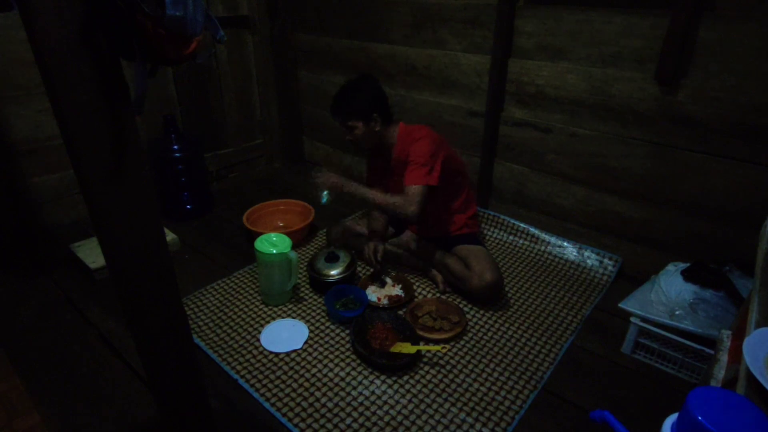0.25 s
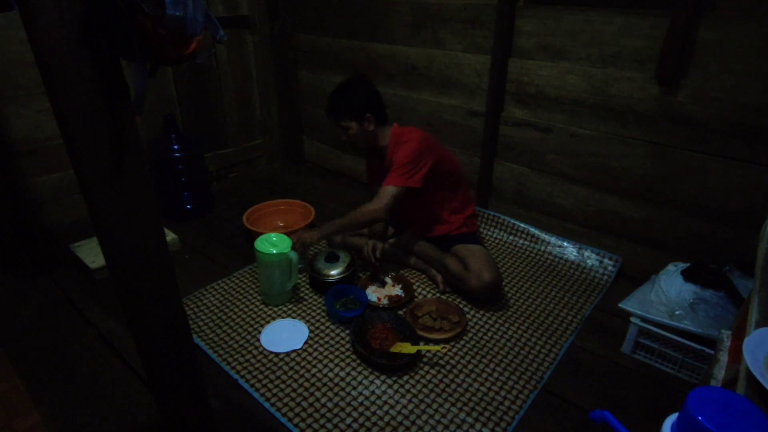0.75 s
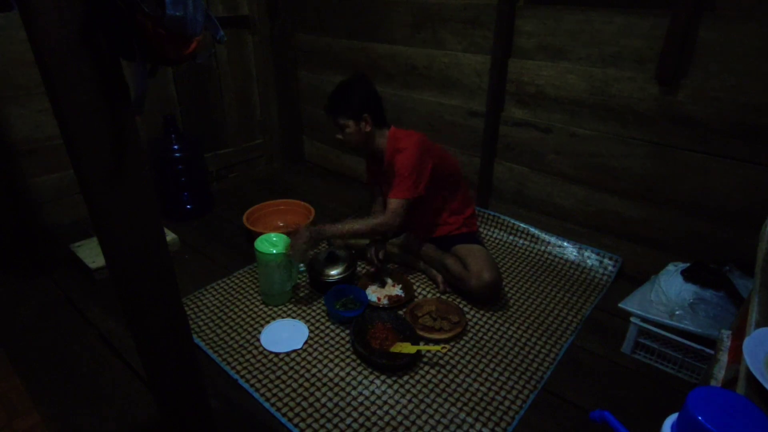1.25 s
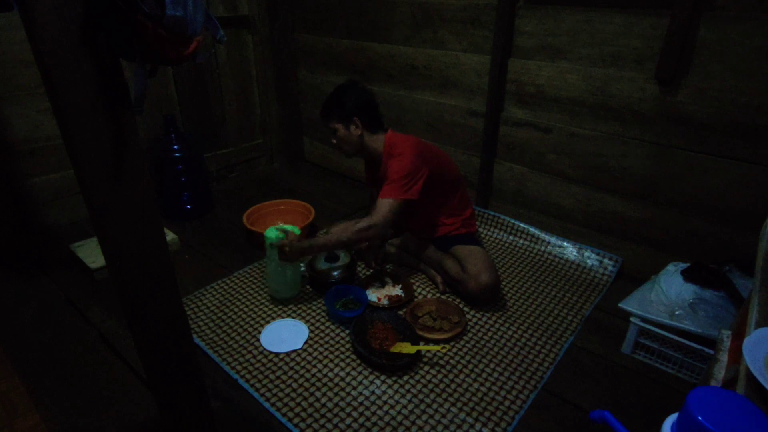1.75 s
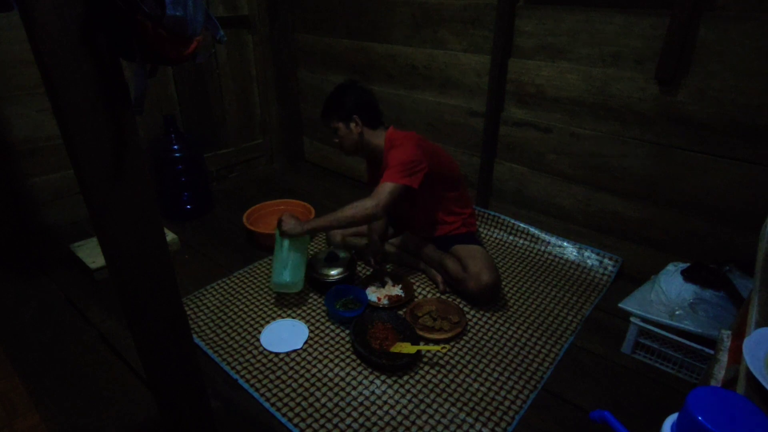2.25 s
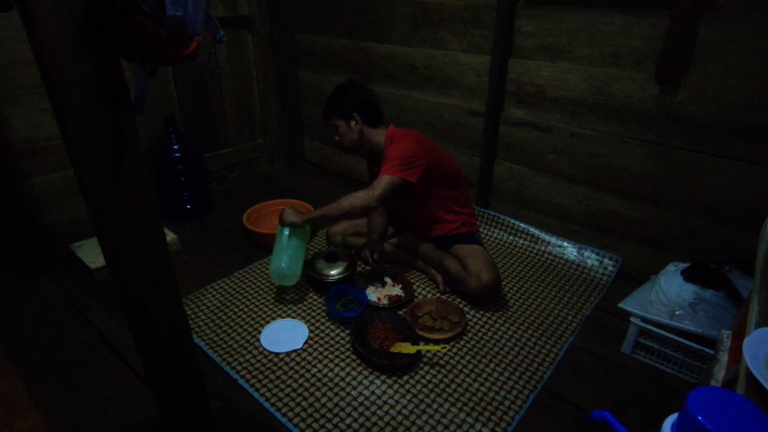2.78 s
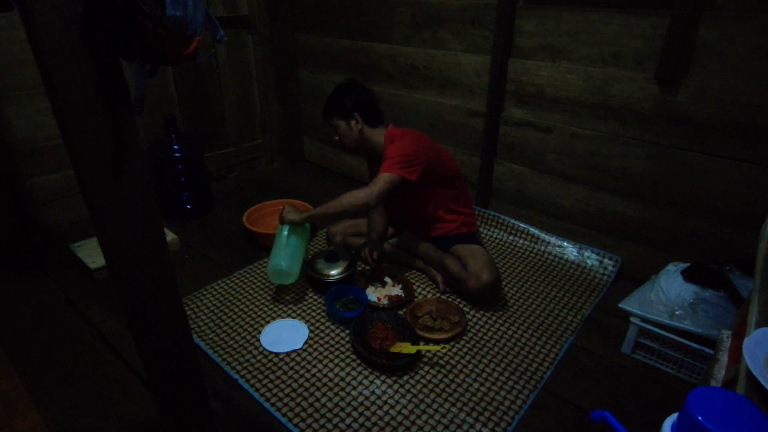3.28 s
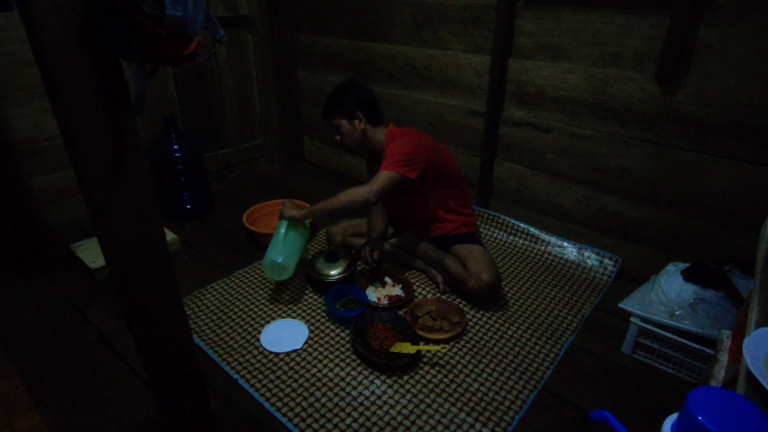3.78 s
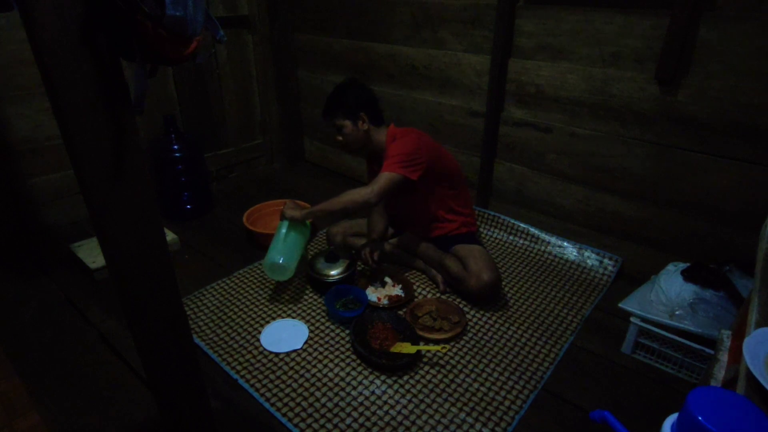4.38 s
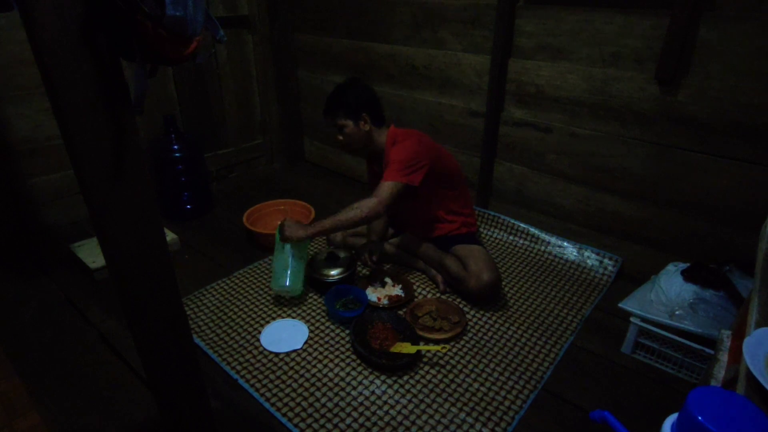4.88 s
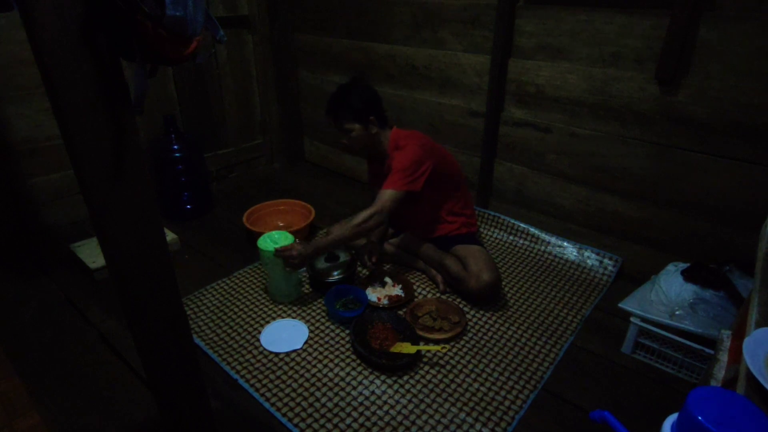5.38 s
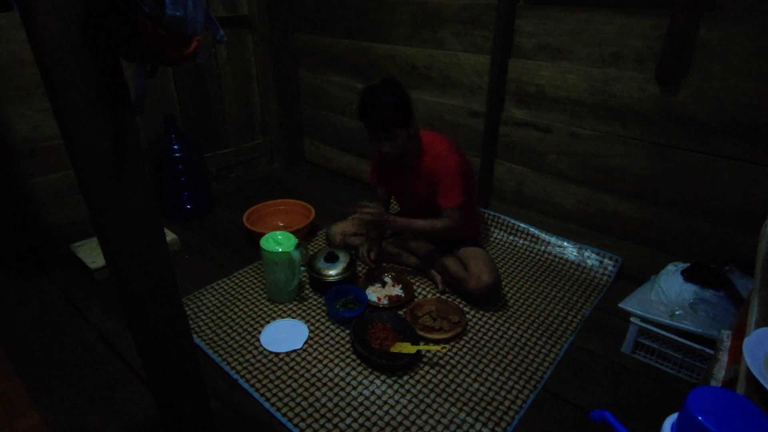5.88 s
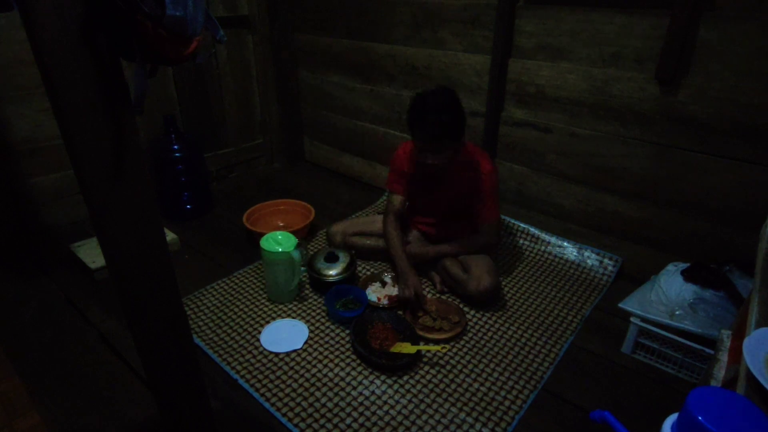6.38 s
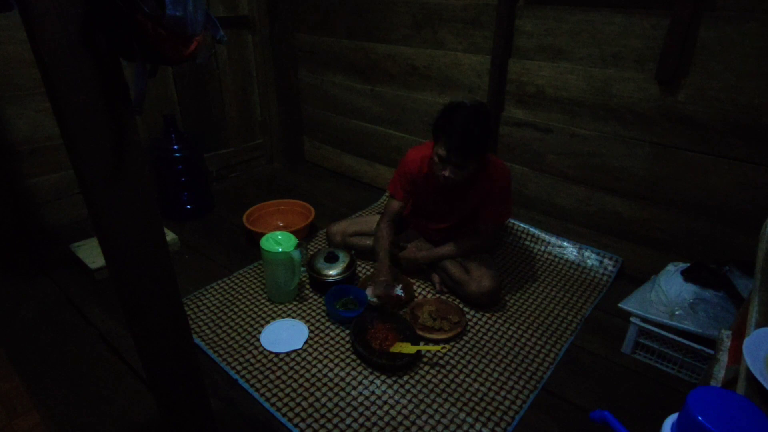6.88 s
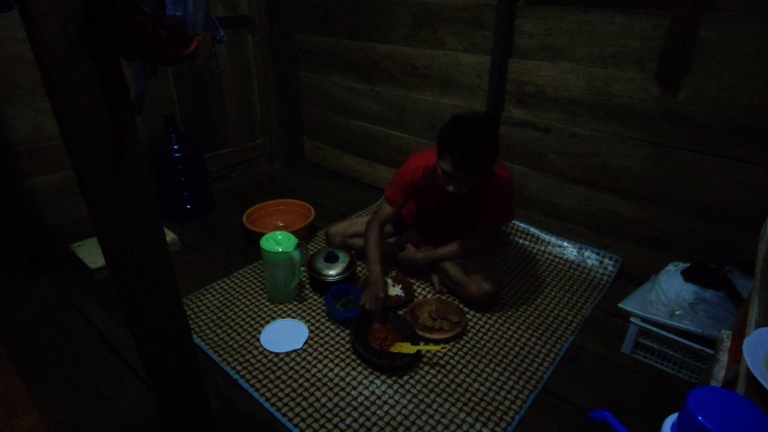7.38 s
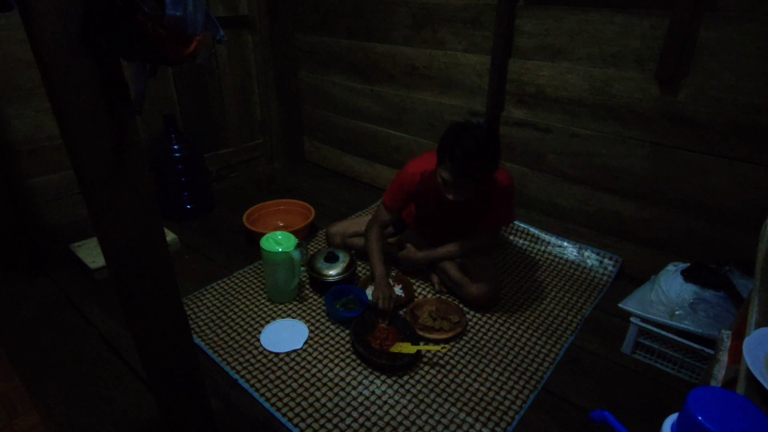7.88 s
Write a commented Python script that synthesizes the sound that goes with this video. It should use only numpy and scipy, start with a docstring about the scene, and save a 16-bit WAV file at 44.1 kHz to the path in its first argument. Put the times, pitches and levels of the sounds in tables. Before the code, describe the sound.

Inside a wooden hut, a cup thumps on the floor, water pours with rising pitch, and a dish clinks over constant crickets.

```python
"""Wooden hut in the forest at night: crickets and katydids sing outside through the plank walls.
Inside a cup is set on the floor mat, filled from a plastic jug, the jug is put back, a dish is tapped.
Water: ringing bubbles, an air column rising in pitch as the cup fills, splash and spitting drops.
Objects: decaying modes struck by blows. Hands: clumps of crackles. The hut adds a short reverb.
Insects: random clicks or noise in wing resonances, gated by strokes and chirps; one is a sagging tone."""
import sys
import numpy as np
from scipy import signal
from scipy.fft import rfft, irfft
from scipy.io import wavfile
from scipy.ndimage import uniform_filter1d

SR = 44100
rng = np.random.default_rng(int(sys.argv[2]) if len(sys.argv) > 2 else 0)


def dump(signal):
    """Clip the signal to [-1, 1] and save it as 16-bit WAV at the path in sys.argv[1]."""
    limited = np.clip(np.atleast_2d(signal).T, -1, 1)
    pcm = np.round(limited * 32767).astype(np.int16)
    wavfile.write(sys.argv[1], SR, pcm)


N = 358974
T = np.arange(N) / SR  # s

# Air gulped into the tipped jug (low pitches), small bubbles in the cup (high pitches):
# start_s, level_db, pitch_hz
GLUGS = [(3.195, -3, 632), (3.324, -9, 617), (3.558, -14, 604), (3.574, -19, 565), (3.617, -10, 582),
         (3.6207, -28, 2430), (3.639, -15, 557), (3.77, -18, 602), (3.789, -19, 587), (3.8167, -31, 2530),
         (3.855, -20.5, 540), (3.905, -15.5, 552), (3.7743, -33, 2770), (3.8521, -35, 3140),
         (4.0597, -25.5, 3530), (4.127, -21, 540), (4.7277, -31, 3090), (4.7311, -28.5, 1360),
         (4.7855, -27, 1310), (4.8673, -26.5, 1395), (4.9635, -32, 3320)]
# Slugs of water landing in the cup, each ringing the air column: start_s, level_db
SLUGS = [(3.203, -2.5), (3.224, -16.5), (3.239, -20), (3.272, -19), (3.301, -19), (3.352, -23), (3.47, -12),
         (3.501, -25), (3.617, -22), (3.772, -23.5), (3.904, -32), (4.14, -33), (4.24, -34), (4.4248, -26),
         (4.48, -23.5), (4.635, -29), (4.74, -28), (4.8591, -23), (4.966, -36), (5.1131, -32), (5.124, -23)]
# Strength of the stream: time_s, level_db
POUR = [(3.185, -34.5), (3.26, -38), (3.45, -47.5), (3.63, -41.5), (3.75, -45), (4.2, -45.5), (4.45, -50.5),
        (4.88, -44), (4.95, -55.5), (5.14, -47), (5.22, -83)]
# Splash spectrum: freq_hz, density_db
SPLASH_SPECTRUM = [(500, 3.5), (1200, 5.5), (1800, -3.5), (2500, -1), (4000, 1), (7000, -4), (16000, -19)]
# Drops spitting on the rim: start_s, level_db, centre_hz
SPITS = [(3.052, -44, 10000), (3.2415, -42, 10600), (3.2932, -36, 9600), (3.3204, -40, 10000),
         (3.4281, -28.5, 9860), (3.7738, -38, 10800), (4.1295, -40, 9900), (4.3375, -44, 9810),
         (4.7002, -38, 10450), (6.2766, -42, 10800)]
GLUG_T60_S = 0.036
FILL_START_S, FILL_END_S, FILL_CURVE = 3.25, 5.22, 1.16
EMPTY_HZ, FULL_HZ = 752, 1302  # the air column shortens as the cup fills
SLOSH_DB, SLOSH_T60_S = -18, 0.32  # the column keeps sounding after each slug; dB re slug
SLOSH_SPLASH_DB = -26  # splash thrown up by each slug, re slosh
STREAM_COLUMN_DB = -5  # re stream
OVERTONE_RATIO, OVERTONE_DB = 3.1, -8  # a cup closed below also sounds near three times its pitch

# Jug knocks: start_s, level_db, hardness_db_per_octave
JUG_KNOCKS = [(4.427, -27, 6.5), (4.47, -34, 2), (4.858, -27.5, 2), (5.739, -36, 5), (5.763, -18.5, 6),
              (5.811, -13.5, -8), (5.877, -21.5, -3), (5.884, -27, -11), (6.013, -44, 14)]
# Jug modes: freq_hz, level_db, t60_s
JUG_MODES = [(348, 10, 0.09), (420, -3, .04), (654, -7, 0.041), (925, -11, 0.011), (1190, -22, 0.2),
             (1605, -19, 0.047), (2300, -20, 0.039), (2905, -19, 0.028)]
# Dish taps: start_s, level_db, hardness_db_per_octave
DISH_TAPS = [(6.277, -38, 2), (6.3727, -6, 0.3)]
# Dish modes: freq_hz, level_db, t60_s
DISH_MODES = [(602, -13.5, 0.041), (1240, -16, 0.038), (1460, -3, 0.038), (1534, -4.5, 0.033),
              (2590, -5, .04), (2650, 2, 0.041), (2760, -7, 0.026), (3600, -2, 0.015), (8860, -1.5, 0.012)]
# Cup clinks: start_s, level_db, hardness_db_per_octave
CUP_CLINKS = [(.173, -25.5, 5), (.196, -26.5, -11), (7.536, -31, 73)]
# Cup modes: freq_hz, level_db, t60_s
CUP_MODES = [(1965, 6, 0.066), (2100, 8.5, 0.066), (2480, 1, 0.036)]
# Thumps on the floor: start_s, level_db, hardness_db_per_octave
THUMPS = [(.957, -13.5, 4), (1.01, -13.5, -12), (1.29, -30, -1.5), (5.36, -34.5, 8), (5.41, -29.5, -14),
          (5.47, -34.5, -4), (6.68, -36, -3)]
# Floor board modes: freq_hz, level_db, t60_s
BOARD_MODES = [(53.7, -19.5, 1), (83.14, -4.5, 0.68), (109.8, -1, 0.44), (172, 1.5, 0.056),
               (236, -8.5, 0.074), (322, -10, 0.16), (510, -24, 0.068)]
# Fingers and lid on plastic: start_s, level_db, hardness_db_per_octave
GRIPS = [(.3, -26.5, -4), (.321, -22, -2), (.35, -38, 6), (.443, -29, 12), (.462, -20, 0), (.494, -30, 9),
         (.529, -27, 17), (5.871, -22.5, 3)]
# Gripped plastic modes: freq_hz, level_db, t60_s
GRIP_MODES = [(527, -4, 0.026), (605, 4.5, 0.047), (682, 0.5, 0.074), (924, 1, 0.03), (1150, -8, 0.048),
              (1330, -9, 0.046), (1770, -20, 0.041)]
SOFT_RISE_DB_PER_DB = 2.2  # soft blows take longer to build

# Hands and cloth on the mat: start_s, hold_s, level_db
RUSTLES = [(.935, .03, -36), (1.105, 0.35, -55), (1.467, 0.3, -47.5), (5.302, 0.34, -52),
           (5.758, 0.043, -40.5), (5.996, .02, -50), (6.295, .05, -57), (7.4, 0.1, -50), (7.95, .2, -49.5)]
# Rustle spectrum: freq_hz, density_db
RUSTLE_SPECTRUM = [(200, 10), (500, 2.5), (1200, -5), (2500, -8.5), (4000, -7.5), (8000, -30), (15000, -38)]
RUSTLE_RISE_S, RUSTLE_FADE_DB_PER_S = 0.015, 149

# Hut reverb decay: freq_hz, t60_s
HUT_DECAY = [(100, 0.2), (500, 0.23), (2000, 0.22), (10000, 0.18)]
HUT_DB = 0.04  # re direct sound

# Steady singers: wing_hz, width_hz, level_db, chirps_per_s, chirp_mid_s, chirp_depth (0-1),
# strokes_per_s, stroke_mid_s, stroke_depth (0-1)
SINGERS = [(7210, 295, -35, 4.6, 4.04, 0.32, 8.4, 4.03, 0),
           (7371, 250, -35.5, 3.4, 3.7, 0, 46, 4.028, 0.16), (8230, 670, -49.5, 2, 4, 0, 150, 4, 0.2)]
# Far trills: wing_hz, width_hz, level_db
FAINT_TRILLS = [(2758, 62, -66.5), (3365, 230, -58), (5170, 18, -49), (5850, 38, -61.5), (7116, 41, -40),
                (8390, 22, -54)]
# Whistling cricket level: time_s, level_db
WHISTLER_LEVEL = [(0.0, -59.5), (3.24, -43), (4.51, -52.5), (8.14, -43.5)]
# Whistling cricket song: wing_hz, width_hz, chirps_per_s, chirp_mid_s, chirp_depth (0-1),
# strokes_per_s, stroke_mid_s, stroke_depth (0-1)
WHISTLER_SONG = (5645, 65, 4.5, 4.138, 0.55, 31, 4.9, 0.37)
TEETH_PER_S = 2500  # scrapes of file on wing, all insects of one kind together

# Field cricket wings: wing_hz, width_hz, level_db
FIELD_WINGS = [(4763, 490, -42), (5046, 325, -40.5)]
# Field cricket strokes: strokes_per_s, stroke_mid_s, stroke_depth (0-1)
FIELD_STROKES = (29.3, 4.062, 0.18)
# Two field cricket bands drifting in and out of step: chirps_per_s, chirp_mid_s, pause_depth_db
FIELD_BANDS = [(5.31, 4.143, 5), (4.89, 4.035, 3.5)]
PAUSE_SHARPNESS = 3.8
# Higher chirper, bouts: start_s, end_s, level_db, chirps_per_s, chirp_mid_s
CHIRP_BOUTS = [(-.1, .78, -39.5, 5, 0.48), (1.55, 4.25, -40, 4.7, 3), (5.248, 6.7, -44, 5.35, 7.1),
               (7.4, 8.3, -45, 4.82, 7.727)]
# Higher chirper, song: wing_hz, width_hz, strokes_per_s, stroke_mid_s, stroke_depth (0-1)
CHIRP_SONG = (5400, 300, 32.6, 2.8, 0.18)
CHIRP_GAP_DB, CHIRP_SHARPNESS = 13, 2.3

# Buzzing katydid bouts: start_s, end_s, level_db
BUZZ_BOUTS = [(.42, 0.623, -51), (1.362, 1.643, -51), (2.72, 3.006, -38.5), (3.178, 3.365, -40.5),
              (3.56, 3.632, -39), (4.11, 4.46, -43), (4.55, 4.851, -50), (5.05, 5.27, -47),
              (5.518, 5.85, -40.5), (6.2, 6.45, -45), (7.343, 7.631, -38.5), (7.875, 8.14, -50)]
BUZZ_HZ, BUZZ_WIDTH_HZ, BUZZES_PER_S = 6250, 1570, 380
BUZZ_RISE_S, BUZZ_STOP_S, BUZZ_IDLE_DB, BUZZ_SWELL_DB = 0.046, 0.025, -51, 1

# Tree cricket phrases: start_s, end_s, level_db, stroke_mid_s, strokes_per_s
TREE_PHRASES = [(-.3, 0.573, -43.5, .2046, 21.4), (1.681, 2.62, -44.5, 2.158, 22.9),
                (3.452, 4.4, -44, 3.935, 22), (4.385, 5.29, -45, 4.8666, 23.6),
                (6.377, 7.34, -44, 6.7808, 23.93), (7.3, 8.17, -43.5, 7.8261, 24.32)]
TREE_HZ, TREE_FALL_HZ = 3790, 400  # each stroke starts high and sags
TREE_SLACK_HZ = 140  # weak strokes at the ends of a phrase sit lower
TREE_SWELL_S, TREE_FADE_S, TREE_EDGE_DB = 0.33, 0.41, -18.5

# Far chorus blurred by the trees: freq_hz, density_db
NIGHT_SPECTRUM = [(3000, -31.5), (3900, -52), (4200, -17.5), (4600, -19), (5300, -16), (5900, -33),
                  (6500, -12), (6930, 0), (7560, -3), (7800, -10), (8630, -11), (9500, -23), (11200, -32),
                  (11800, -35.5), (15600, -38)]
# Low murmur of the air: freq_hz, density_db
RUMBLE_SPECTRUM = [(25, -64), (60, -39), (110, 9), (150, -5.5), (250, -7), (415, -10.5), (600, -17.5),
                   (1200, -24.5), (2200, -31), (3200, -29), (3900, -34), (5000, -44)]
NIGHT_DB, RUMBLE_DB = -33.5, -44
EDGE_HZ = 15600  # upper band limit


def amp(db):
    """Amplitude ratio of a level in dB."""
    return 10 ** (np.asarray(db) / 20)


def evened(x):
    """Unit RMS."""
    return x / np.sqrt(np.mean(x ** 2) + 1e-20)


def read(points, hz):
    """Curve interpolated over log frequency."""
    point_hz, value = np.transpose(points)
    return np.interp(np.log(hz + 1), np.log(point_hz + 1), value)


def follow(rows):
    """Second column of a time curve at every sample."""
    rows = np.asarray(rows)
    return np.interp(T, rows[:, 0], rows[:, 1])


def within(rows):
    """One between the first and last time of a curve, with 10 ms ramps inside the ends."""
    return np.clip(np.minimum(T - rows[0][0], rows[-1][0] - T) / .01, 0, 1)


def add(mix, start_s, sound):
    """Mixes a sound in place, cut at the end of the mix."""
    part = mix[round(start_s * SR):][:len(sound)]
    part += sound[:len(part)]


def resonate(x, hz, width_hz):
    """Resonance at a fixed or moving hz: shift down to zero, low-pass, shift back; unit RMS."""
    turn = np.exp(2j * np.pi * np.cumsum(hz * np.ones(len(x))) / SR)
    r = np.exp(-np.pi * width_hz / SR)
    low_pass = [[1, 0, 0, 1, -r, 0.0084], [1, 0, 0, 1, -2 * r, r * r]]
    return evened((turn * signal.sosfilt(low_pass, x / turn)).real)


def clicks(per_s, spread_db):
    """Clicks of random sign and size at random moments."""
    size_db = spread_db * np.minimum(rng.exponential(1, N), 4)
    size = amp(size_db) * rng.choice([-1., 1.], N)
    return size * (rng.random(N) < per_s / SR)


def coloured(x, spectrum):
    """Spectrum curve imposed on x; unit RMS."""
    gain = amp(read(spectrum, np.fft.rfftfreq(N, 1 / SR)))
    return evened(irfft(rfft(x) * gain, N))


def throb(per_s, middle_s, depth):
    """A regular swell with short gaps."""
    swing = np.cos(2 * np.pi * per_s * (T - middle_s))
    return 1 - np.clip(depth, 0, 1) * (1 - np.tanh(2.2 * swing + 0.93))


def pauses(per_s, middle_s, depth_db, sharpness):
    """A regular dip in level between chirps."""
    return amp(-depth_db * abs(np.sin(np.pi * per_s * (T - middle_s))) ** sharpness)


def bubble(hz, t60_s, rise_per_s):
    """A ringing air pocket whose pitch climbs as it nears the surface."""
    t = np.arange(round(min(t60_s, .2) * SR)) / SR
    tone = np.sin(2 * np.pi * hz * t * (1 + rise_per_s * t))  # pitch climbs at twice rise_per_s
    return tone * amp(-60 * t / t60_s) * np.minimum(t * hz / 2.94, 1)


def water():
    """Glugs, the air column over the rising water, splash with small bubbles, and spitting drops."""
    out, slosh = np.zeros(N), np.zeros(N)
    filled = np.clip((T - FILL_START_S) / (FILL_END_S - FILL_START_S), 0, 1) ** FILL_CURVE
    column_hz = 1 / ((1 - filled) / EMPTY_HZ + filled / FULL_HZ)

    for start_s, level_db, pitch_hz in GLUGS:
        add(out, start_s, amp(level_db) * bubble(pitch_hz, GLUG_T60_S, 0.55))
    for (start_s, level_db), detune in zip(SLUGS, rng.standard_normal((len(SLUGS), 1))):
        slug_hz = column_hz[round(start_s * SR)] * (1 + .025 * detune)
        add(out, start_s, amp(level_db) * bubble(slug_hz, GLUG_T60_S, 0.34))
        add(slosh, start_s, amp(level_db + SLOSH_DB - 60 * T[:SR] / SLOSH_T60_S))

    # scattered drops shake the column; a tilted surface gives it a weaker upper partner
    column = resonate(clicks(250, 4.2), column_hz, 190)
    upper = 0.47 * resonate(clicks(60, 5.2), 1.18 * column_hz, 297)
    upper += amp(OVERTONE_DB) * resonate(clicks(150, 4.8), OVERTONE_RATIO * column_hz, 440)

    fizz = np.zeros(N)
    for hz in np.geomspace(950, 4200, num=20):
        fizz += signal.oaconvolve(clicks(12, 3.6), bubble(hz, 90 / hz, 3.0))[:N]
    splash = 0.55 * evened(fizz) + 0.66 * coloured(clicks(1500, 5.8), SPLASH_SPECTRUM)

    stream = within(POUR) * amp(follow(POUR))
    out += (slosh + amp(STREAM_COLUMN_DB) * stream) * column
    out += stream * upper
    out += (stream + amp(SLOSH_SPLASH_DB) * slosh) * splash

    for (start_s, level_db, hz), puff in zip(SPITS, rng.standard_normal((len(SPITS), 1300))):
        add(out, start_s, amp(level_db) * resonate(puff, hz, 2900) * np.exp(-T[:1300] / 0.0079))
    return out


def blows(events, modes, crack):
    """Each blow rings the modes of one object; harder blows wake the higher modes and crack."""
    out, t = np.zeros(N), np.arange(SR // 2) / SR
    noises = rng.standard_normal((len(events), 200))
    for (start_s, level_db, hard_db), noise in zip(events, noises):
        ring = np.zeros(len(t))
        for hz, mode_db, t60_s in modes:
            tilt_db = hard_db * np.log2(hz / modes[0][0])
            ring += amp(mode_db + tilt_db - 60 * t / t60_s) * np.sin(2 * np.pi * hz * t)
        ring /= abs(ring).max()
        crack_noise = uniform_filter1d(noise, size=4) * np.exp(-t[:200] / 0.0017)
        ring[:200] += crack * amp(min(hard_db, 6)) * crack_noise
        rise_s = 0.00064 * amp(-SOFT_RISE_DB_PER_DB * np.clip(hard_db, -10, 0))
        add(out, start_s, amp(level_db) * ring * np.minimum(t / rise_s, 1))
    return out


def rustle():
    """Clumps of small crackles under moving hands."""
    level = np.zeros(N)
    for start_s, hold_s, level_db in RUSTLES:
        fade_db = RUSTLE_FADE_DB_PER_S * np.maximum(T - start_s - hold_s, 0)
        level += np.clip((T - start_s) / RUSTLE_RISE_S, 0, 1) * amp(level_db - fade_db)
    return level * coloured(clicks(2000, 7.5), RUSTLE_SPECTRUM)


def hut(x):
    """Reverb: sparse taps of random sign, each band dying at its own speed."""
    taps = np.zeros(SR // 2)
    slots = np.arange(150, SR // 2 - 20, 20)
    taps[slots + rng.integers(0, 20, len(slots))] = rng.choice([-1., 1.], len(slots))
    hz, t, bands = signal.stft(taps, SR, nperseg=256)
    decay = amp(-60 * t / read(HUT_DECAY, hz)[:, None])
    tail = signal.istft(bands * decay, SR, nperseg=256)[1]
    return signal.fftconvolve(x, tail / np.linalg.norm(tail))[:N]


def chorus():
    """Wings scraped by files: dense clicks ring each wing, in strokes grouped into chirps."""
    out = np.zeros(N)
    for hz, width_hz, level_db, *beat in SINGERS:
        wing = resonate(clicks(TEETH_PER_S, 1.4), hz, width_hz)
        out += amp(level_db) * evened(wing * throb(*beat[:3]) * throb(*beat[3:]))
    for hz, width_hz, level_db in FAINT_TRILLS:
        out += amp(level_db) * resonate(clicks(TEETH_PER_S, 2.9), hz, width_hz)
    hz, width_hz, *beat = WHISTLER_SONG
    whistle = resonate(clicks(650, 0.83), hz, width_hz) * throb(*beat[:3]) * throb(*beat[3:])
    return out + amp(follow(WHISTLER_LEVEL)) * whistle


def crickets():
    """Two bands of field crickets whose pauses show when they fall in step; a higher one chirps in bouts."""
    field = np.zeros(N)
    for hz, width_hz, level_db in FIELD_WINGS:
        field += amp(level_db) * resonate(clicks(TEETH_PER_S, 0.6), hz, width_hz)
    rhythm = throb(*FIELD_STROKES)
    for band in FIELD_BANDS:
        rhythm = rhythm * pauses(*band, PAUSE_SHARPNESS)
    field *= evened(rhythm)

    hz, width_hz, *strokes = CHIRP_SONG
    chirps = np.zeros(N)
    for start_s, end_s, level_db, per_s, middle_s in CHIRP_BOUTS:
        gaps = pauses(per_s, middle_s, CHIRP_GAP_DB, CHIRP_SHARPNESS)
        chirps += amp(level_db) * within([[start_s], [end_s]]) * gaps
    wing = resonate(clicks(TEETH_PER_S, 1.3), hz, width_hz)
    return field + chirps * wing * evened(throb(*strokes))


def buzzer():
    """Katydid: bouts of rough pulses at a fast even beat in a wide wing resonance."""
    level = np.zeros(N)
    for start_s, end_s, level_db in BUZZ_BOUTS:
        swell_db = -BUZZ_SWELL_DB * np.clip((end_s - T) / (end_s - start_s), 0, 1)
        gate = np.clip(np.minimum((T - start_s) / BUZZ_RISE_S, (end_s - T) / BUZZ_STOP_S), 0, 1)
        level += amp(level_db + swell_db) * gate
    pulses = throb(BUZZES_PER_S, 0, 0.6) * rng.standard_normal(N)
    return (level + amp(BUZZ_IDLE_DB)) * resonate(pulses, BUZZ_HZ, BUZZ_WIDTH_HZ)


def tree_cricket():
    """A tone that sags within every wing stroke; leaves scatter it into a blur."""
    phrase = np.searchsorted([row[0] for row in TREE_PHRASES], T) - 1
    start_s, end_s, level_db, middle_s, per_s = np.transpose(TREE_PHRASES)[:, phrase]
    effort = np.clip(np.minimum((T - start_s) / TREE_SWELL_S, (end_s - T) / TREE_FADE_S), 0, 1)
    turn = ((T - middle_s) * per_s + .5) % 1  # position within a stroke, 0-1
    hz = TREE_HZ - TREE_SLACK_HZ * (1 - effort) - TREE_FALL_HZ * turn ** 2.2
    hz = uniform_filter1d(hz, size=40)
    press = np.sin(np.pi * turn ** .75) ** 1.1
    stroke = np.sin(2 * np.pi * np.cumsum(hz) / SR) * press
    leaves = rng.standard_normal(6000) * amp(-60 * T[:6000] / 0.2)
    scattered = signal.oaconvolve(stroke, leaves)[:N]
    song = evened(stroke) + 1.5 * evened(scattered)
    blur = resonate(rng.standard_normal(N), 3594, 350) * (0.48 + 0.71 * press)
    level = amp(level_db + TREE_EDGE_DB * (1 - effort) ** 1.7)
    return level * (0.75 * evened(song) + 0.45 * blur)


def patchy(spectrum, patchy_db):
    """Background noise whose short-time spectrum drifts in patches."""
    frames, hz = N // 256 + 5, np.fft.rfftfreq(1024, 1 / SR)
    real, imag, patches = rng.standard_normal((frames, 513, 3)).T
    patches = uniform_filter1d(patches, size=10, axis=0)  # across frequency
    patches = evened(uniform_filter1d(patches, size=20, axis=1))  # across time
    bins = (real + 1j * imag) * amp(read(spectrum, hz)[:, None] + patchy_db * patches)
    return evened(signal.istft(bins, nperseg=1024, noverlap=768)[1][:N])


def scene():
    """Sounds inside with their hut reverb, insects outside, and the murmur of the air."""
    near = water() + rustle()
    near += blows(JUG_KNOCKS, JUG_MODES, crack=0.15)
    near += blows(DISH_TAPS, DISH_MODES, crack=0.39)
    near += blows(CUP_CLINKS, CUP_MODES, crack=0.17)
    near += blows(THUMPS, BOARD_MODES, crack=0.065)
    near += blows(GRIPS, GRIP_MODES, crack=0.38)
    far = chorus() + crickets() + buzzer() + tree_cricket()
    far += amp(NIGHT_DB) * patchy(NIGHT_SPECTRUM, patchy_db=0.93)
    murmur = amp(RUMBLE_DB) * patchy(RUMBLE_SPECTRUM, patchy_db=1.1)
    return (near + amp(HUT_DB) * hut(near) + far + murmur)[None]


def record(dry):
    """The microphone's bass roll-off, then the recorder's band limit."""
    bass_cut = signal.butter(3, 45, "high", fs=SR, output="sos")
    thin = signal.sosfilt(bass_cut, dry)
    band_limit = signal.firwin(1023, EDGE_HZ, window=("kaiser", 9), fs=SR)
    return signal.oaconvolve(thin, band_limit[None], "same")


dry = scene()
out = record(dry)
dump(out)
```